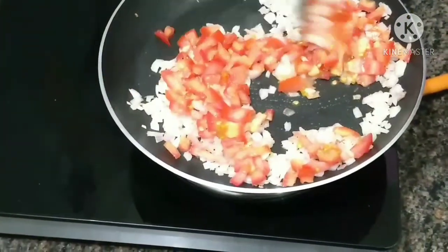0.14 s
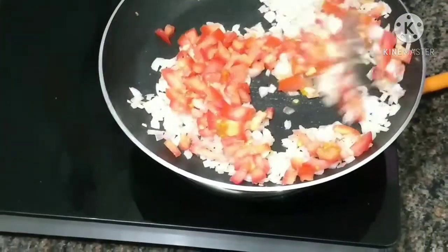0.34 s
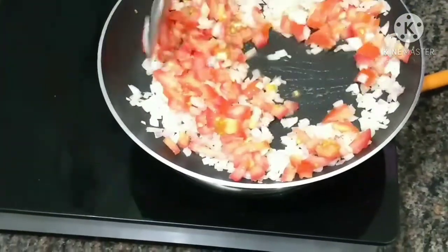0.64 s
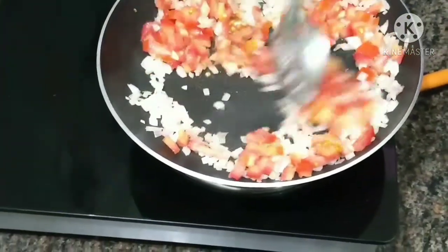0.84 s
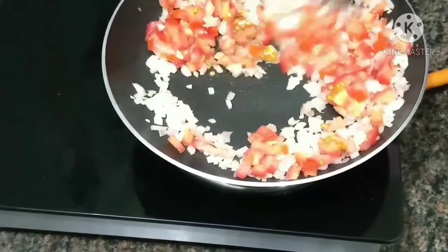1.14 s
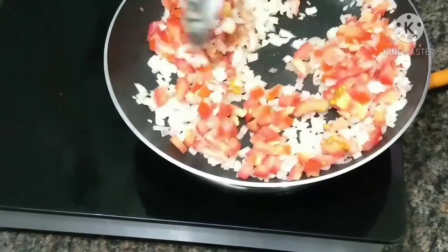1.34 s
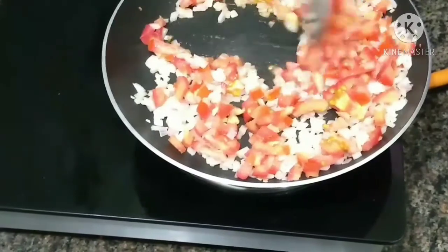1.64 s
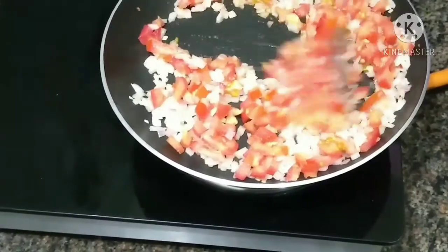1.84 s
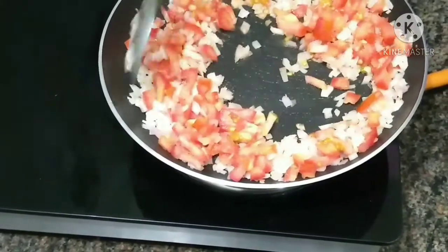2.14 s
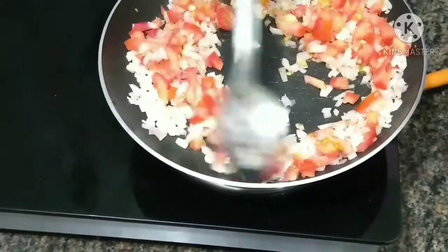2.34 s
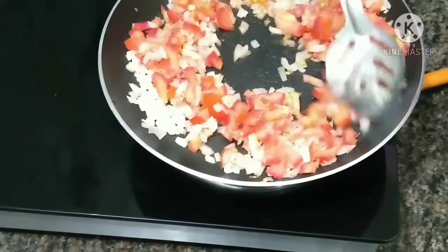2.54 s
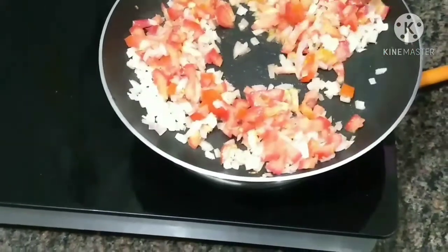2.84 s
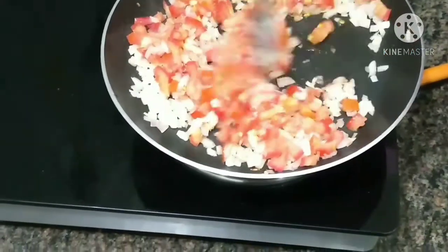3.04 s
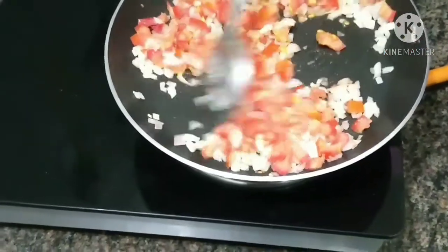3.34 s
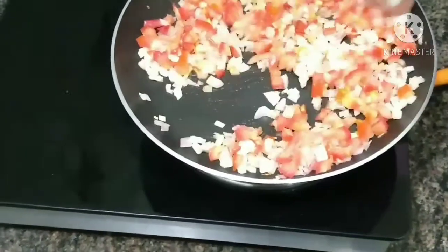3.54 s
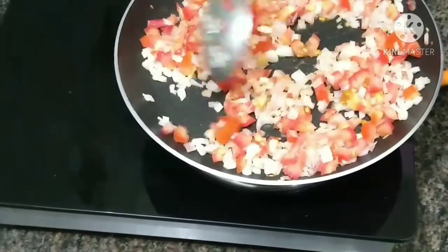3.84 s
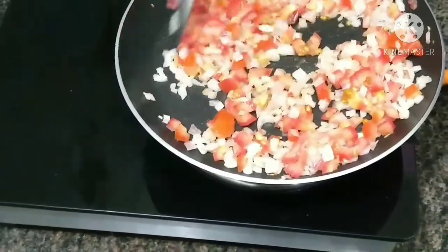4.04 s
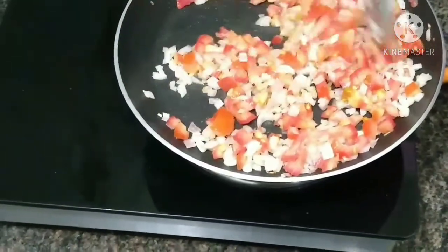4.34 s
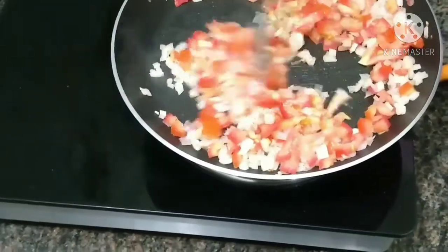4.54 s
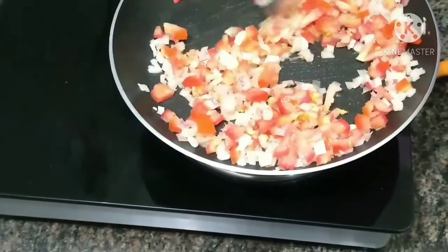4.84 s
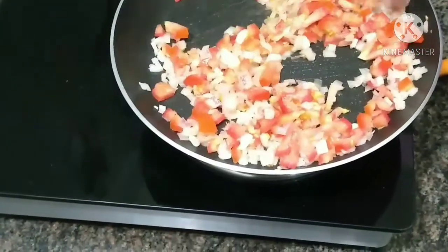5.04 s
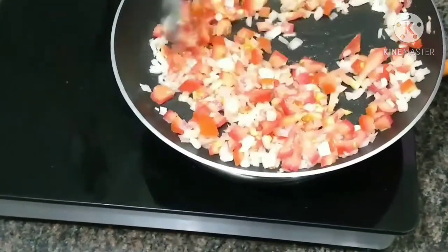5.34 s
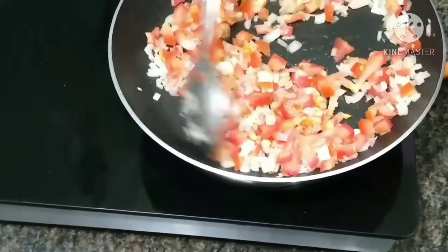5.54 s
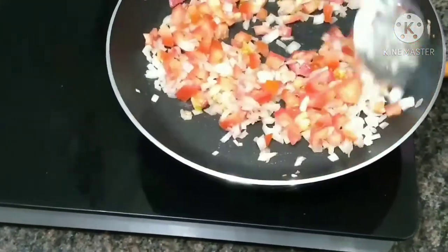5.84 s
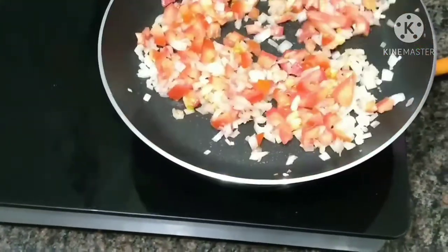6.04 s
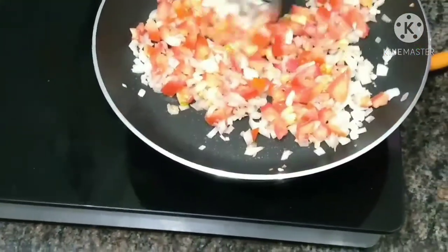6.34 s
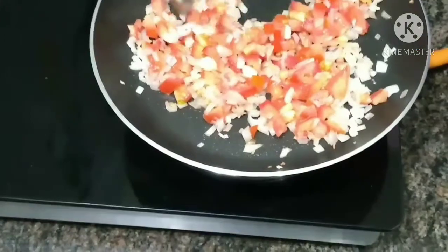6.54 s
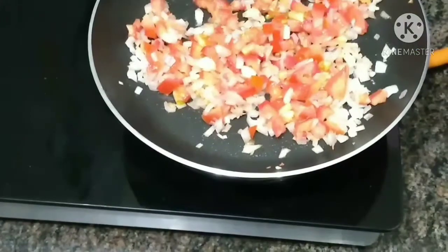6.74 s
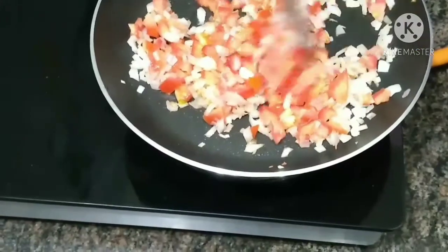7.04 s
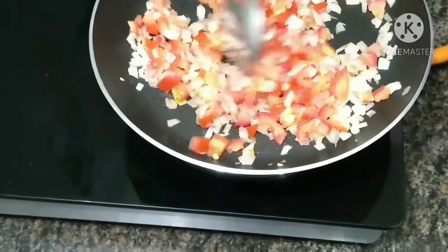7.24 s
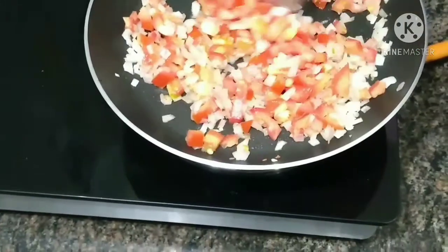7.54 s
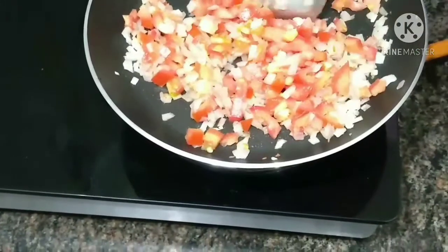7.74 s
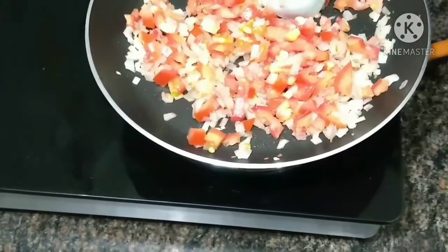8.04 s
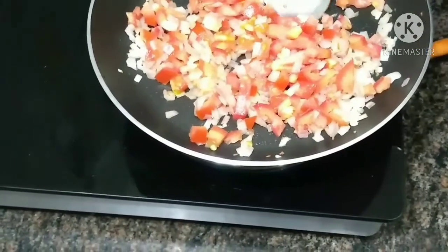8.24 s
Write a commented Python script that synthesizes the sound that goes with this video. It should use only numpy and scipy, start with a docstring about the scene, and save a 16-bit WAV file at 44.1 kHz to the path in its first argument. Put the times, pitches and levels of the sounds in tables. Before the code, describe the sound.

Close above a frying pan in a small home kitchen: a fine, airy sizzle, busy wet crackling in the first few seconds, soft tumbling of moist pieces. Irregular metal spoon taps, dull rubs and short scrapes ring the thin pan briefly, with three hard clanks mid-way and later. Then sparse light touches as the frying quietens over a faint hob-fan hum-like rush.

```python
"""Chopped onions and tomatoes sizzle gently in a non-stick pan on a hob, as clumps of short noise puffs.
Turned pieces crackle wetly and tumble softly. A metal spoon knocks, scrapes and rubs: pushes and slips ring
damped pan modes and a dense noise tail; wavering sines give its low groans and the pan's ring near 585 Hz.
Behind it lies the low rush of the hob fan and the small kitchen, shaped from noise.
Held above the pan, a phone hears all this through two differently coloured microphone ports."""
import sys
import numpy as np
from scipy import signal
from scipy.fft import rfft, irfft
from scipy.io import wavfile
from scipy.ndimage import uniform_filter1d, minimum_filter1d

SR = 44100
rng = np.random.default_rng(int(sys.argv[2]) if len(sys.argv) > 2 else 0)


def int16_out(signal):
    """Quantize to a 16-bit WAV file."""
    q = np.round(np.clip(np.atleast_2d(signal).T, -1, 1) * 32767)
    wavfile.write(sys.argv[1], SR, q.astype(np.int16))


N = 369557
TIME = np.arange(N) / SR
RING_SAMPLES = int(.5 * SR)

# pan modes, t60 before the spoon damps them: f/Hz, relative level/dB, t60/s
PAN_MODES = [(110, -13, 0.3), (148, 0.5, 0.34), (258.3, 0, 0.28), (279, -3.5, 0.32), (345.8, -5.5, 0.67),
             (365.4, -1, 0.34), (437, 3, 0.23), (586, 2, 0.41), (678, -1, 0.26), (766, -6.5, 0.44),
             (823.5, -2, 0.3), (938.5, 2, 0.18), (1018, -5, 0.24), (1304, -4, 0.17), (1465, 0.5, 0.18),
             (1655, -2.5, 0.25), (2075, -9, 0.55), (2227, -1, 0.2), (2365, -12, 0.16), (2796, 6, 0.096),
             (3468, 25.5, 0.011), (3604, -4.5, 0.23), (4570, -30, 0.2)]

HISS_DB, CRACKLE_DB = 11.5, 10.5  # steam hiss and resting crackle, over the sizzle level
RESTLESS_DB, RESTLESS_RATE = 1, 3.6  # the crackle wanders as pieces settle; changes per s
TURN_ATTACK_S, TURN_RELEASE_S = 0.045, 0.056  # linear rise, then time constant of the calming

SLIP_RATE, SLIP_SPREAD_DB = 1200, 3.5  # slips per s in a drag, and how unequal they are
DRAG_EASE_DB, DRAG_DULLING = 8.5, 0.98  # fall along a drag; its high edge as a share of the blow's
GRIP_DB, GRIP_RATE = 2, 90.6  # the edge catches and lets go along a drag; changes per s
TONE_WAVER_HZ = 15.7  # how far the pitch of a pan tone wanders
SPOON_DAMPING_T60_S = 0.64  # the spoon stays on the pan and damps its modes
BARE_TOP_HZ = 12100  # top of the bare metal's bright edge
SPOT_WIDTH = 0.016  # relative width of a favoured ring
MODE_SCATTER_DB, MODES_DB = 2, -18.5  # chance per contact; modes against clatter

KITCHEN_DB = -66.5
PEAK_LIMIT, TOP_HZ = .82, 15400


def frying():
    """A fine even hiss from the hot base; wet pieces crackle and tumble softly where they are turned over."""
    # steam hiss: f/Hz, level/dB
    hiss_spectrum = [(500, -41), (1200, -29), (2200, -6.5), (3000, -10.5), (3700, 0), (4600, -3.5),
                     (6500, -5), (9500, -11), (12500, -17), (15000, -16.5)]
    # wet crackle: f/Hz, level/dB
    crackle_spectrum = [(300, -33), (800, -8.5), (1400, -6.5), (2200, -2), (3000, 6.5), (3700, 5.5),
                        (4500, -5), (7000, -12.5), (14000, -58)]
    # soft pieces falling over each other: f/Hz, level/dB
    tumble_spectrum = [(40, -8), (120, -8), (250, -10.5), (380, -3.5), (650, 5), (1000, -17), (2500, -11)]
    # the sizzle builds, then sinks as the wet tomato cools the pan: t/s, level/dB
    sizzle = [(0.0, -62.5), (0.79, -59.5), (1.68, -59), (5.58, -62.5), (6.28, -64.5), (6.84, -63.5),
              (8.38, -68)]
    # the spoon turns a heap over onto hot metal: t/s, length/s, wet crackle level/dB, soft tumbling level/dB
    turns = [(0.0, 0.13, -51.5, -56.5), (0.5, 0.22, -45.5, -78), (0.637, 0.11, -39, -56),
             (0.75, 0.17, -45, -82), (1.415, 0.048, -47, -59), (1.86, 0.038, -48, -58),
             (2.055, 0.053, -39.5, -52), (2.175, 0.084, -40.5, -62), (2.713, 0.19, -50, -88),
             (5.61, 0.021, -47, -62), (5.896, 0.019, -49.5, -65), (6.94, 0.43, -54.5, -73)]

    hiss = bursts(hiss_spectrum, rate=5600, spread_db=3.0, clump_db=1.27, clump_rate=54,
                  wall_db=-28, room_db=-16)
    crackle = bursts(crackle_spectrum, rate=1700, spread_db=3.5, clump_db=2.5, clump_rate=110,
                     wall_db=-11, room_db=-25.0)
    tumble = bursts(tumble_spectrum, rate=140, spread_db=0.5, clump_db=3.5, clump_rate=28,
                    wall_db=-5, room_db=-46)

    heat = undb(np.interp(TIME, *np.transpose(sizzle)))
    crackle_level = heat * undb(CRACKLE_DB + RESTLESS_DB * walk(RESTLESS_RATE))
    tumble_level = crackle_level * undb(-15)
    for s, length, crackle_db, tumble_db in turns:
        turn = flare(s, length)
        # hypot adds the powers
        crackle_level = np.hypot(crackle_level, undb(crackle_db) * turn)
        tumble_level = np.hypot(tumble_level, undb(tumble_db) * turn)
    return hiss * heat * undb(HISS_DB) + crackle * crackle_level + tumble * tumble_level


def bursts(spectrum, rate, spread_db, clump_db, clump_rate, wall_db, room_db):
    """Clumps of bursts: each is a puff of noise with tails from the pan wall and the kitchen; rms 1."""
    pops = clicks(N, rate, spread_db) * undb(clump_db * walk(clump_rate))
    puff = fade(0.0029) + undb(wall_db) * fade(0.19) + undb(room_db) * fade(0.46)
    power = np.maximum(signal.fftconvolve(pops ** 2, puff ** 2)[:N], 0)
    sound = colour(diffuse(N) * np.sqrt(power), spectrum)
    return sound / rms(sound)


def flare(s, length):
    """A turned heap flares up quickly just before s, holds for its length and calms down."""
    attack = np.clip((TIME - s) / TURN_ATTACK_S + 1, 0, 1)
    return attack * np.exp(-np.maximum(TIME - s - length, 0) / TURN_RELEASE_S)


def spoon():
    """Each stroke is one push and a train of uneven slips; bumps are dull pushes, pan tones wavering sines."""
    # dense ring of pan, spoon and worktop: f/Hz, level/dB
    clatter_spectrum = [(30, -60.5), (100, 11.5), (200, -7.5), (400, 5.5), (900, -1.5), (1400, -3.5),
                        (3700, 2), (4500, -4), (6500, -5), (9000, -9.5), (15000, -22)]
    # The spoon strikes the pan, then drags on; food between makes it dull, bare metal adds a bright edge:
    # t/s, blow level/dB, drag length/s, drag level/dB, low edge f/Hz, high edge f/Hz,
    # share of bare metal/dB, lower and upper ring that the spot favours f/Hz, their gain/dB
    strokes = [(0.001, -33.5, 0.042, -39, 400, 3400, -26, 276, 1290, 4),
               (0.34, -36.5, 0.022, -31, 403, 4400, -47, 583, 940, 1.5),
               (0.362, -32, 0.033, -29, 1630, 6070, -31, 1472, 2805, 7.5),
               (2.185, -32.5, 0.024, -32.5, 340, 1910, -15.5, 432, 2210, 14),
               (2.229, -37, 0.13, -40, 403, 1000, -28, 431, 770, 13),
               (2.334, -41, 0.2, -39, 370, 1140, -30, 770, 1472, 6),
               (2.492, -47, 0.11, -42, 390, 910, -29, 583, 1290, 11),
               (3.252, -36.5, 0.044, -34.5, 292, 1460, -17, 583, 940, 2.5),
               (3.93, -22.5, 0.046, -21.5, 241, 3050, -15, 366, 583, 9),
               (3.973, -27, 0.11, -33.5, 243, 845, -44, 366, 430, 6.5),
               (3.985, -53, 0.087, -37.5, 1200, 3080, -21, 1640, 2210, 9),
               (4.072, -43, 0.029, -33.5, 300, 3000, -32, 366, 2380, -6),
               (4.322, -47.5, 0.019, -55, 5170, 9000, -30, 3568, 4603, -9),
               (4.68, -18, 0.12, -24.5, 527, 6800, -7, 675, 3568, 11),
               (5.081, -39, 0.032, -37, 360, 800, -24.5, 583, 675, 2),
               (5.429, -53, 0.11, -43.5, 248, 980, -24.5, 432, 1472, 10.5),
               (5.512, -50, 0.08, -41.5, 394, 1040, -22, 583, 1015, 14),
               (5.695, -35.5, 0.091, -38.5, 400, 895, -42, 583, 675, 6),
               (6.156, -38, 0.019, -35.5, 1150, 6000, -34, 1472, 3568, -14),
               (6.177, -17.5, 0.095, -32, 350, 5100, -48, 583, 2805, 9),
               (6.2, -45, 0.16, -46, 480, 1100, -35, 567, 1010, 7),
               (6.284, -42, 0.009, -55, 3000, 6500, -35, 2805, 3568, 0),
               (6.517, -39, 0.074, -46.5, 430, 1430, -13.5, 583, 675, 4),
               (7.456, -47.5, 0.015, -52, 2570, 6200, -35, 940, 3568, -7),
               (7.845, -49.5, 0.077, -57, 910, 3600, -32, 940, 2020, -13),
               (8.077, -35.5, 0.033, -33.5, 350, 3510, -9, 366, 2380, 14),
               (8.132, -39, .022, -51.5, 340, 3480, -8, 366, 770, 9)]
    # dull bumps, as food lands or the pan rocks on the hob: t/s, level/dB, low edge f/Hz, high edge f/Hz
    bumps = [(0.676, -53.5, 600, 1000), (0.964, -59, 550, 800), (1.424, -59, 250, 700),
             (1.451, -57, 200, 704), (1.518, -46, 110, 199), (1.812, -55, 400, 560),
             (1.863, -56.5, 250, 600), (1.897, -58, 100, 400), (2.052, -56.5, 550, 750),
             (2.247, -49, 90, 170), (6.846, -66, 300, 450), (7.153, -61, 300, 450), (7.475, -57, 550, 880),
             (7.769, -61, 500, 900), (8.115, -47, 70.4, 142)]
    # wavering pan tones: low groans of the rubbing spoon, and the pan's own ring near 585 Hz:
    # t/s, length/s, level/dB, first f/Hz, last f/Hz
    tones = [(2.52, .12, -53, 584, 584), (2.99, .145, -47.5, 315, 362), (5.425, .07, -41.5, 490, 435),
             (5.715, .085, -42, 590, 584), (5.79, .05, -53, 450, 480), (5.82, .09, -53, 586, 584)]

    out = np.zeros((2, N))
    clatter = colour(diffuse(N), clatter_spectrum)
    push = np.ones(1)
    for (s, blow_db, length, drag_db, low_hz, high_hz, bare_db,
         ring_hz, upper_ring_hz, ring_db) in strokes:
        favoured = spot([ring_hz, upper_ring_hz], ring_db)
        blow = pan_sound(push, clatter, blow_db, low_hz, high_hz, bare_db, favoured)
        add(out, s, blow)
        scrape = pan_sound(drag(length), clatter, drag_db, low_hz, DRAG_DULLING * high_hz,
                           bare_db, favoured)
        add(out, s, scrape)
    for s, db, low_hz, high_hz in bumps:
        add(out, s, pan_sound(push, clatter, db, low_hz, high_hz, bare_db=-39, spot_db=-2))
    for s, length, db, first_hz, last_hz in tones:
        add(out, s, undb(db) * pan_tone(length, first_hz, last_hz))
    return out


def drag(length):
    """Uneven slips of the spoon's edge, which catches and lets go, weaker as the hand eases off."""
    slips = clicks(RING_SAMPLES, SLIP_RATE, SLIP_SPREAD_DB)[:int(length * SR)]
    ease_db = DRAG_EASE_DB * np.linspace(0, 1, len(slips))
    grip_db = GRIP_DB * walk(GRIP_RATE)[:len(slips)] - ease_db
    return slips * signal.windows.tukey(len(slips), .2) * undb(grip_db)


def pan_tone(length, first_hz, last_hz):
    """A sine whose pitch and level waver, blurred by the room; rms 1."""
    count = int(length * SR)
    hz = np.linspace(first_hz, last_hz, count) + TONE_WAVER_HZ * walk(148)[:count]
    level = signal.windows.tukey(count, .4) * undb(2.8 * walk(110)[:count])
    tone = level * np.sin(2 * np.pi * np.cumsum(hz) / SR)
    paths = undb(-38) * diffuse(RING_SAMPLES) * fade(0.24)
    paths[:, 0] += 1  # the direct sound
    sound = signal.fftconvolve(tone[None], paths, axes=-1)
    return sound / rms(sound[:, :count])


def spot(rings_hz, db):
    """Extra dB for each mode: the place of contact favours those near some pitches."""
    apart = np.log(np.array(PAN_MODES)[:, :1] / np.array(rings_hz)) / SPOT_WIDTH
    return db * np.exp(-apart ** 2).max(axis=1)


def pan_sound(force, clatter, db, low_hz, high_hz, bare_db, spot_db):
    """A force rings the pan; the spot weights the modes and the contact sets the band that is excited."""
    scatter_db = MODE_SCATTER_DB * rng.standard_normal(len(PAN_MODES))
    modes = pan_modes(force, spot_db + scatter_db)

    i = rng.integers(N - RING_SAMPLES)
    decay = undb(8) * fade(.014) + fade(.2) + undb(-32) * fade(.55)  # crack, ring, long tail
    dense = clatter[:, i:i + RING_SAMPLES] * decay
    full = signal.fftconvolve(force[None], dense, axes=-1) + undb(MODES_DB) * modes

    bare = undb(bare_db) * band(full, "low", BARE_TOP_HZ, order=4)
    contact = band(band(full, "low", high_hz, order=4) + bare, "high", low_hz, order=2)
    # the pan's weight shifts on the hob
    thud = undb(-18.5) * band(band(full, "low", 240, order=4), "high", 47, order=2)
    sound = contact + thud
    loud = len(force) + int(.02 * SR)  # the level is set over the contact and 20 ms more
    return sound * undb(db) / rms(sound[:, :loud])


def pan_modes(force, gains_db):
    """The modes share a force's energy; higher ones reach the two ports further out of step."""
    force, out = np.pad(force, (0, RING_SAMPLES - 1)), 0
    for (hz, db, t60), gain_db in zip(PAN_MODES, gains_db):
        loss = np.log(1000) * (1 / t60 + 1 / SPOON_DAMPING_T60_S) / SR
        # a complex one-pole resonator
        ring = signal.lfilter([1], [1, -np.exp(2j * np.pi * hz / SR - loss)], force)
        size = undb(db + gain_db) * rms(force) / rms(np.abs(ring)) / np.sqrt(2 * loss)
        lag = min(hz / 1300, 2) * np.array([[.7], [0]])  # radians at left, right
        out = out + (size * np.exp(-1j * lag) * ring).imag
    return out


def kitchen():
    """The low, slightly wavering rush of the hob's fan and the room, as coloured noise."""
    # hob fan and kitchen: f/Hz, level/dB
    kitchen_spectrum = [(15, -97), (25, -54), (50, -7.5), (102, -4), (157, 1.5), (199, -10), (310, -8),
                        (381, -5.5), (539, -19), (593, -1), (717, -14.5), (1000, -5.5), (1100, -29),
                        (1430, -4.5), (2420, -120)]
    rush = colour(diffuse(N), kitchen_spectrum) * undb(1.5 * walk(9))
    return rush * undb(KITCHEN_DB) / rms(rush)


def diffuse(count):
    """Noise at the two ports: more alike in the bass than in the treble."""
    # how unlike the two ports hear a diffuse field: f/Hz, side level/dB
    width = [(40, -5), (200, -15), (500, -10), (1000, -8), (1600, -1)]
    mid, side = rng.standard_normal((2, count))
    side = colour(side, width)
    return np.array([np.roll(mid + side, 2), mid - side])  # the left port is a little further away


def clicks(count, rate, spread_db):
    """Randomly timed clicks of either sign, many small and a few large."""
    size = undb(spread_db * np.minimum(rng.exponential(size=count), 6))
    return (rng.random(count) < rate / SR) * size * rng.choice([-1, 1], count)


def walk(rate):
    """Random levels held 1 / rate s and slewed; spread near 1."""
    k = max(int(SR / rate), 1)
    held = np.repeat(rng.standard_normal(N // k + 1), k)
    return np.sqrt(3 / 2) * uniform_filter1d(held, k)[:N]  # the root restores the spread


def fade(t60):
    """Exponential decay by 60 dB in t60 s, over the length of a ring."""
    return np.exp(-np.log(1000) * TIME[:RING_SAMPLES] / t60)


def colour(x, points):
    """Causal minimum-phase filter through (Hz, dB) points, from the cepstrum of its log gain."""
    size = 4096
    hz, db = np.transpose(points)
    f = np.maximum(np.arange(size // 2 + 1) * SR / size, 1)
    gain = undb(np.interp(np.log(f), np.log(hz), db))
    cepstrum = irfft(np.log(gain))
    # fold the cepstrum onto positive times
    cepstrum[1:size // 2] *= 2
    cepstrum[size // 2 + 1:] = 0
    response = irfft(np.exp(rfft(cepstrum)))
    response = response.reshape((1,) * (x.ndim - 1) + (-1,))
    return signal.fftconvolve(x, response, axes=-1)[..., :x.shape[-1]]


def band(x, kind, hz, order):
    """Butterworth low-pass or high-pass, its edge kept at or below SR / 3."""
    return signal.sosfilt(signal.butter(order, min(hz, SR / 3), kind, fs=SR, output="sos"), x)


def add(out, s, sound):
    """Mix a sound in at a time in s."""
    i = max(int(s * SR), 0)
    out[:, i:i + sound.shape[-1]] += sound[..., :N - i]


def undb(db):
    """Amplitude factor of a level in dB."""
    return 10 ** (np.asarray(db) / 20)


def rms(x):
    """Root mean square, kept above zero."""
    return np.sqrt(np.mean(x ** 2) + 1e-20)


def scene():
    """Frying, spoon and kitchen sound together."""
    return frying() + spoon() + kitchen()


def record(dry):
    """Each port has its own resonance; the phone limits the loudest peaks and cuts the top."""
    # microphone ports: f/Hz, left level/dB, right level/dB
    port_response = [(536, -3, -2.5), (1520, 2, 1.5), (3370, 0, 0.5), (4865, 2.5, -3), (5710, 13, -4.5),
                     (6960, 0.5, -2.5), (8200, -10.5, -4.5), (9000, -7, 2.5), (12560, 1, 4.5),
                     (15500, -10, -7.5)]
    ports = np.array(port_response)
    heard = np.array([colour(dry[k], ports[:, [0, k + 1]]) for k in range(2)])
    peak = np.abs(heard).max(axis=0)
    gain = PEAK_LIMIT / np.maximum(peak, PEAK_LIMIT)
    smooth_gain = uniform_filter1d(minimum_filter1d(gain, size=65), size=65)
    top_cut = signal.ellip(10, .2, 70, TOP_HZ, fs=SR, output="sos")
    return signal.sosfilt(top_cut, heard * smooth_gain)


dry = scene()
out = record(dry)
int16_out(out)
```